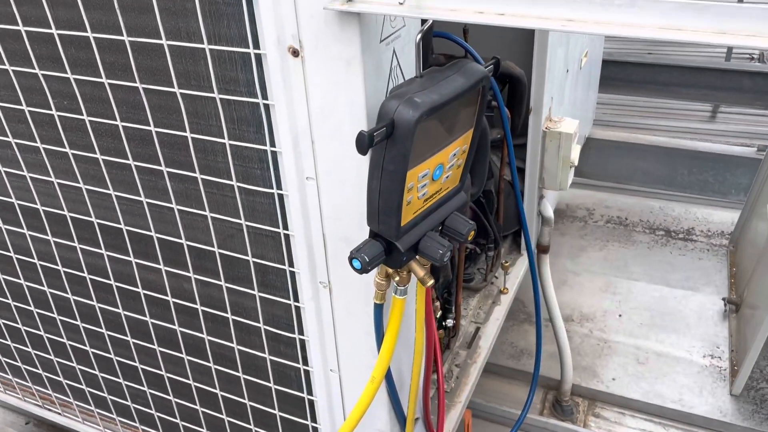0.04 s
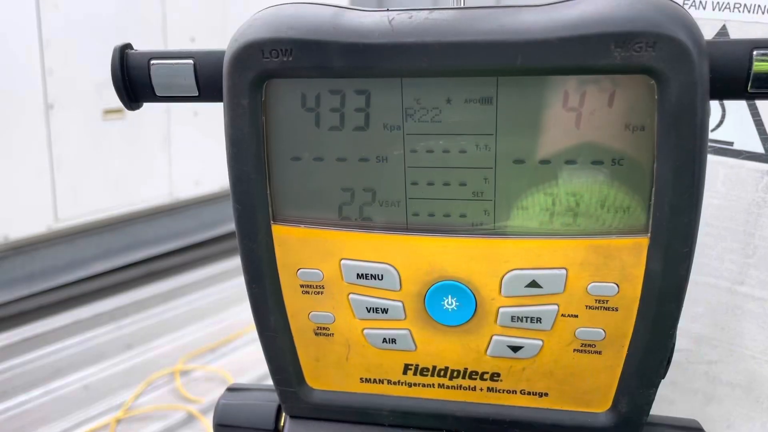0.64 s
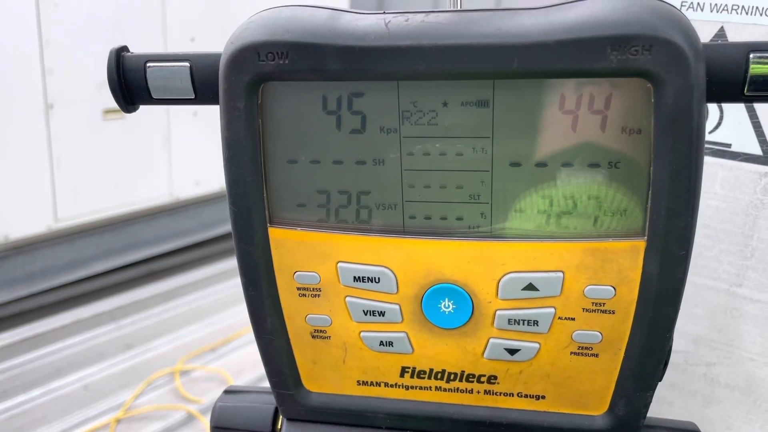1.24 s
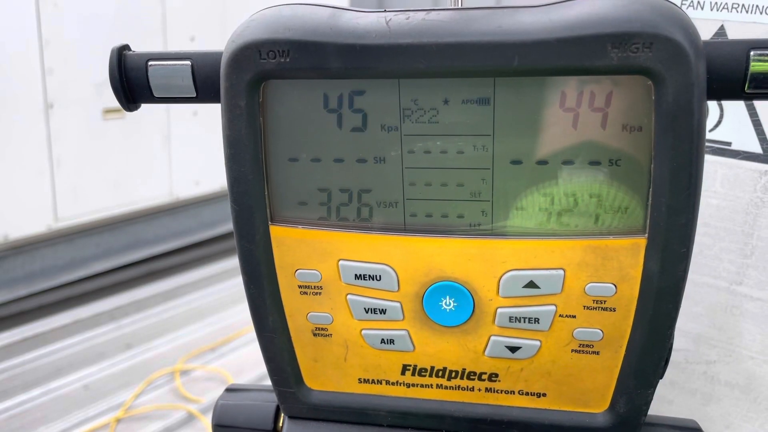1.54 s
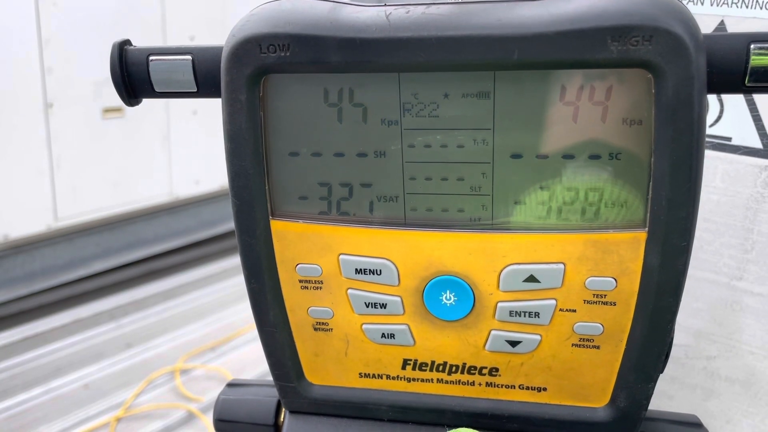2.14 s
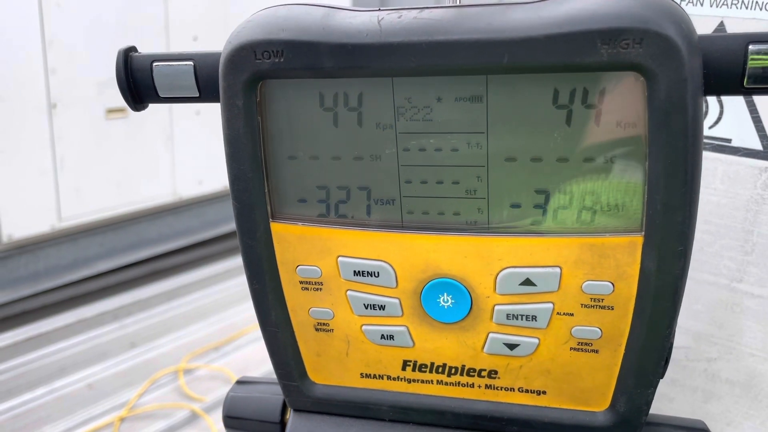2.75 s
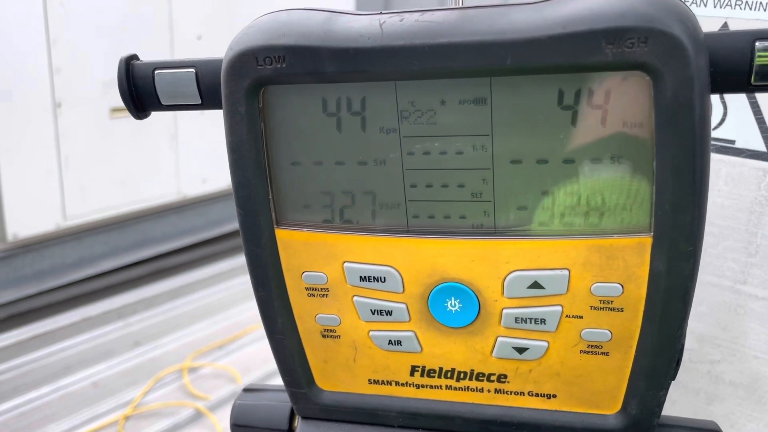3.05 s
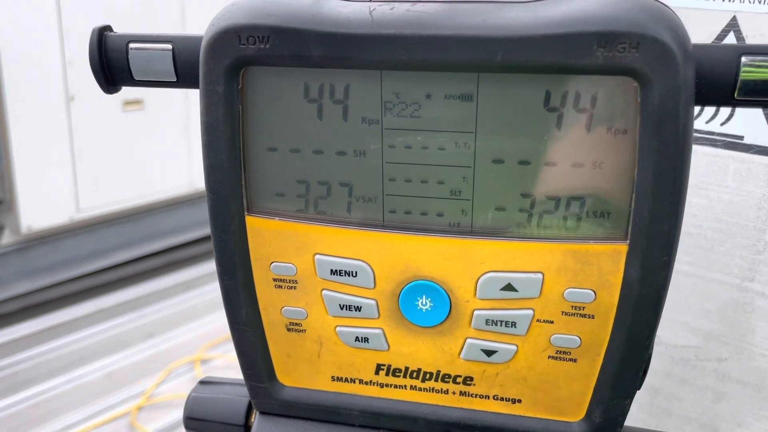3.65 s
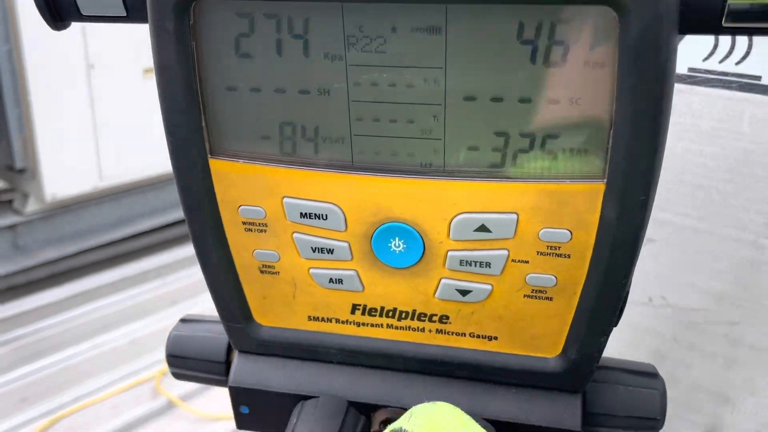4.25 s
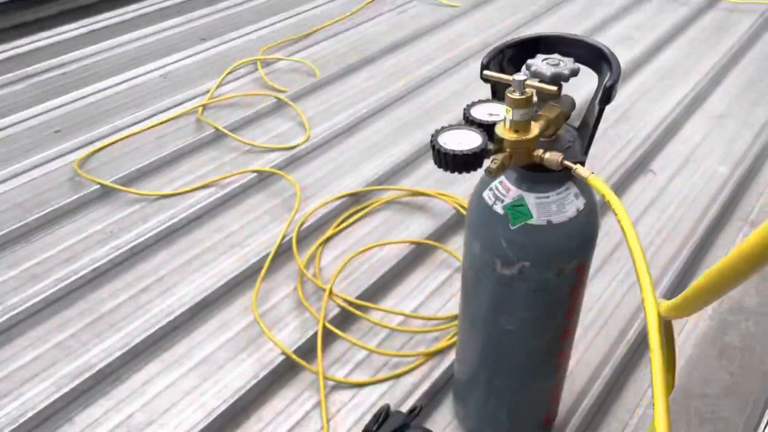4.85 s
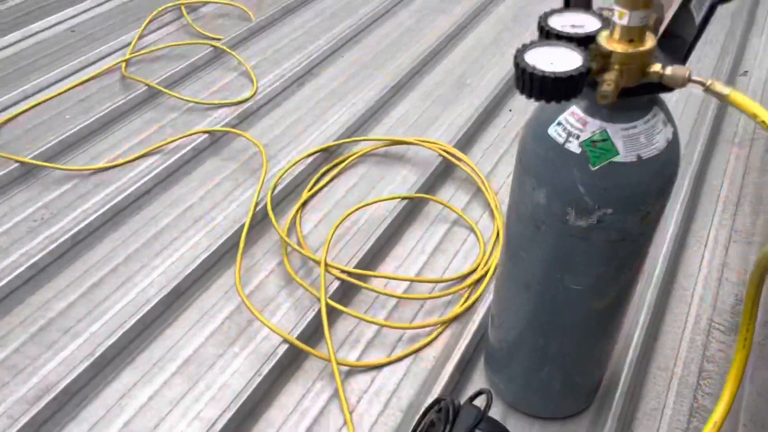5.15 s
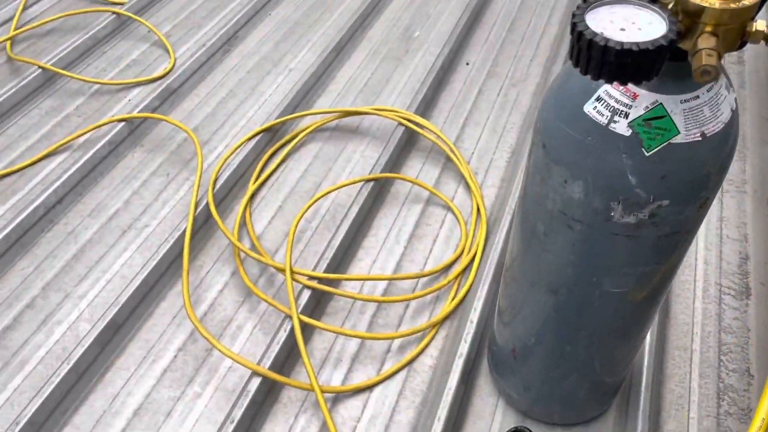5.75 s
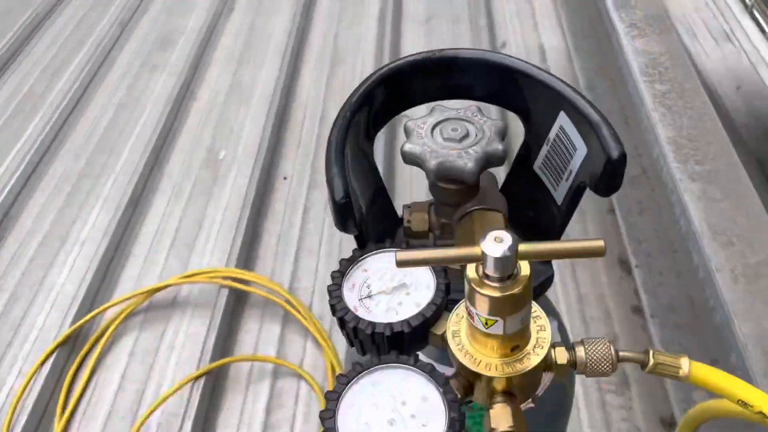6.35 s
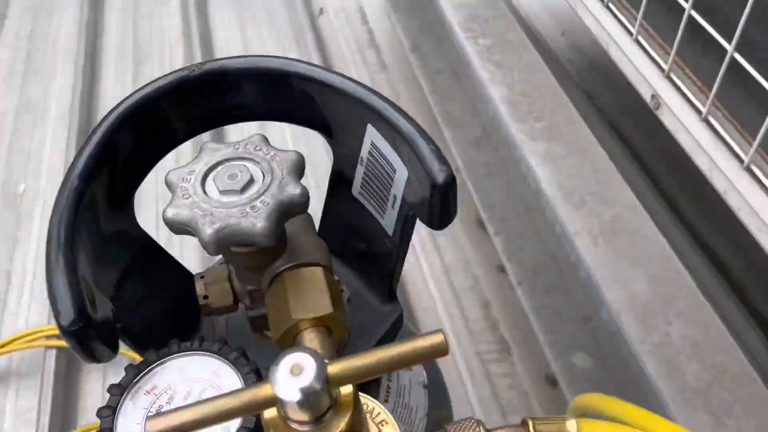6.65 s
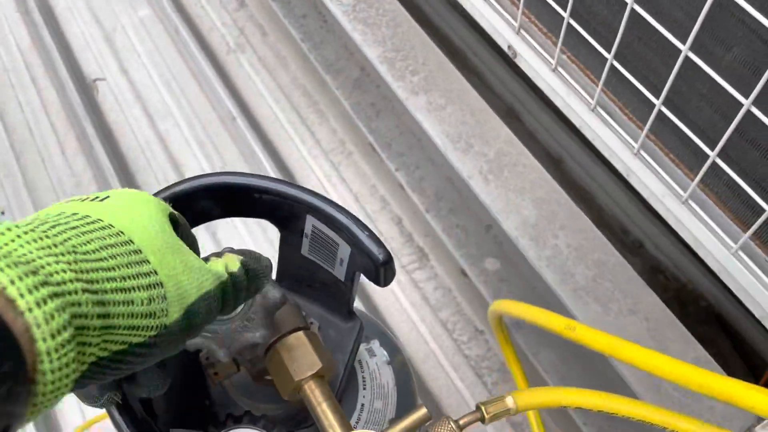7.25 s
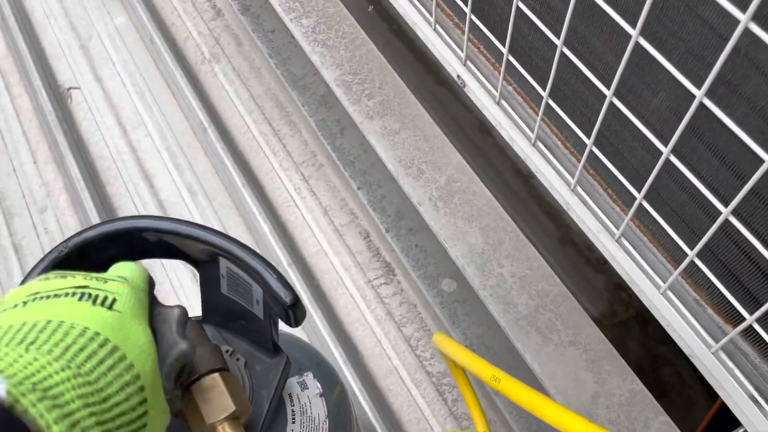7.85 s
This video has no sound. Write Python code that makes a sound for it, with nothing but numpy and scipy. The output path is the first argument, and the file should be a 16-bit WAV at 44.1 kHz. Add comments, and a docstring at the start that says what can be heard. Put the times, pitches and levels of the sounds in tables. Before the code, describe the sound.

A hand-held microphone outdoors picks up the constant low roar and hum of rooftop cooling fans, opening with a short thump of wind. A faint, high hiss of gas swells in brass fittings and fades. Someone then takes a few crunching steps that boom on the metal roof, bumps a steel gas cylinder so that it clunks and rocks, and handles the valve with small ticks and a scrape while the machinery drones on.

```python
"""Air-conditioning plant rumbles and hums on a sheet-metal roof, heard from a hand-held microphone.
Wind buffets it and air rasps in cabinet fins until 0.38 s, where the level dips briefly.
From 3 s nitrogen hisses through a gauge manifold, sings in its fittings and dies away.
From 4.9 s someone takes a few booming, gritty steps over the roof to the gas cylinder,
jolts it at 6.6 s and handles its valve."""
import sys
import numpy as np
from scipy import signal
from scipy.fft import rfft, irfft, next_fast_len
from scipy.io import wavfile
from scipy.ndimage import uniform_filter1d, map_coordinates

SR = 44100
rng = np.random.default_rng(int(sys.argv[2]) if len(sys.argv) > 2 else 0)


def pcm_store(signal):
    """Save signal as 16-bit PCM."""
    levels = np.round(np.clip(np.atleast_2d(signal), -1, 1) * 32767)
    wavfile.write(sys.argv[1], SR, levels.astype(np.int16).T)


N = 348831
N_FFT = next_fast_len(N)
T = np.arange(N) / SR
F = np.maximum(np.fft.rfftfreq(N_FFT, 1 / SR), 1)
SIDE = np.array([[1], [-1]])  # left, right
DIP_S = 0.377

# Heel and sole contacts. Each row: time in s, weight in dB, grit in dB, rise in s.
STEPS = [(4.857, -20, -31, 0.0016), (5.095, -11, -35, 0.021), (5.471, -14.5, -36, 0.002),
         (5.504, -4.5, -26.5, 0.0076), (5.558, -19, -37, 0.013), (5.629, -26, -28.5, .0015),
         (6.124, -36, -31.5, .005), (6.206, -19.5, -27.5, 0.0068), (6.241, -19, -44, .013),
         (6.334, -23, -31.5, 0.0055), (6.557, -11.5, -24.5, 0.002)]


def amp(db):
    """Decibels to gain."""
    return np.exp(np.asarray(db) * (np.log(10) / 20))


def colour(rows, column=1):
    """Gain over F from one dB column of a spectrum table."""
    table = np.transpose(rows)
    return amp(np.interp(np.log(F), np.log(table[0]), table[column]))


def resonance(hz, width_hz):
    """Squared resonance curve over F, 1 at its centre."""
    return 1 / (1 + ((F / hz - hz / F) * (hz / width_hz)) ** 2)


def lift(rows):
    """Gain of resonances standing out from a broad sound."""
    return 1 + sum((amp(lift_db) - 1) * resonance(hz, width_hz) for hz, width_hz, lift_db in rows)


def unit(x):
    """Scale to rms 1."""
    return x / np.sqrt(np.mean(np.abs(x) ** 2))


def white():
    """Spectrum of white noise."""
    return rfft(rng.standard_normal(N_FFT))


def wave(spectrum):
    """Spectrum to sound."""
    return irfft(spectrum, N_FFT)[..., :N]


def pair(side_gain):
    """White noise spectra at two microphone ports that hear nearly the same treble."""
    # Each row: frequency in Hz, extra gain of the unshared part in dB.
    port_width = [(4500, 1), (6000, 2.5), (7500, -44)]
    side = side_gain * colour(port_width)
    return (white() + SIDE * side * white()) / np.sqrt(1 + side ** 2)


def noise(gain, side_db):
    """Coloured stereo noise, rms 1."""
    return unit(wave(pair(amp(side_db)) * gain))


def drift(rate_hz):
    """Random levels, held and smoothed twice; spread near 1."""
    hold = max(int(SR / rate_hz), 1)
    held = np.repeat(rng.standard_normal(N // hold + 1), hold)[:N]
    return 1.3 * uniform_filter1d(uniform_filter1d(held, hold), hold)


def swell(peak_s, rise_s, t60_s):
    """Envelope: exponential rise to 1 at peak_s, then exponential fall."""
    start, end = np.searchsorted(T, [peak_s - 10 * rise_s, peak_s + 2 * t60_s])
    t, out = T[start:end] - peak_s, np.zeros(N)
    out[start:end] = np.exp(np.minimum(t / rise_s, -t * np.log(1000) / t60_s))
    return out


def add(track, start_s, sound):
    """Mix a short sound into a track."""
    part = track[..., int(start_s * SR):][..., :sound.shape[-1]]
    part += sound[..., :part.shape[-1]]


def strike(modes, scatter_db=2):
    """Stereo ring of a struck body, peak 1; each blow stirs the modes differently."""
    age, ring = T[:SR // 4], 0
    for hz, db, t60_s in modes:
        envelope = amp(db + scatter_db * rng.standard_normal((2, 1)) - 60 * age / t60_s)
        ring = ring + envelope * np.sin(2 * np.pi * hz * age) * rng.choice([-1, 1])
    return ring / np.abs(ring).max()


def route(leave_s=4.24, arrive_s=6.8):
    """Microphone place (0 gauges, 1 cylinder), with the roar and fan-rush gains in dB there."""
    # The roar is louder in the open. Each row: time in s, gain in dB.
    exposure = [(1.5, 0), (4.3, 0), (4.7, 2), (6.8, 1.5), (7.9, 1.2)]
    place = np.clip((T - leave_s) / (arrive_s - leave_s), 0, 1)
    roar_db = np.interp(T, *np.transpose(exposure))
    rush_db = 1 - 3 * place
    beside_cabinet = [[.18], [1.5], [-3]]  # shielded from the rush
    return np.where(T < DIP_S, beside_cabinet, [place, roar_db, rush_db])


def wall_echo(x, place, gauges_s=.0052, cylinder_s=.0043, echo_db=-20):
    """The cabinet wall returns the roar; the comb shifts as the microphone moves."""
    delayed_s = T - gauges_s - place * (cylinder_s - gauges_s)
    return x + amp(echo_db) * np.array([np.interp(delayed_s, T, channel) for channel in x])


def fan_roar(place, roar_db, rush_db, gain_db=-24, flicker_db=.87, throb_db=1.1, throb_top_hz=150):
    """Turbulent air from fans and compressors; each octave flickers on its own and the bass throbs."""
    # Each row: frequency in Hz, relative density in dB at the gauges, the same at the cylinder.
    spectra = [(27, -38, -24), (38, -48, -17), (52.2, 0.5, -2), (104.3, 2, -1.5), (132.7, -10.5, -4),
               (183, -8, -12.5), (366, -18.5, -13.5), (610, -18.5, -18.5), (1096, -19.5, -21),
               (1487, -27, -23.5), (2640, -33, -31.5), (3080, -37, -35.5), (7070, -50.5, -48),
               (8100, -55.5, -53.5), (11250, -58.5, -57.5), (14900, -73, -71)]
    # Casing and duct resonances. Each row: centre in Hz, width in Hz, lift in dB.
    casing = [(156.7, 16.7, 6), (590, 75, 2), (870, 44, 2.5), (1296, 36, 6.5), (2290, 260, 3)]
    # Each row: frequency in Hz, side gain in dB ahead of the ports.
    width = [(60, -18), (110, -20.5), (200, -13.5), (380, -3), (700, -6), (1290, 1), (2380, -4), (4400, -4)]
    # Each row: frequency in Hz, left minus right in dB.
    balance = [(100, 0.1), (200, 1), (380, 2.5), (700, 5), (1290, 1), (2380, -0.5), (4400, 1.5),
               (8000, 2.5)]
    at_gauges, at_cylinder = colour(spectra, 1), colour(spectra, 2)
    air = pair(colour(width)) * colour(balance) ** (SIDE / 2) * lift(casing)
    air = air / np.sqrt(np.mean(at_gauges ** 2))
    out, bass_db = 0, throb_db * drift(7)
    for octave in range(-5, 5):
        centre_hz = 1000 * 2. ** octave
        band = air * np.maximum(1 - np.abs(np.log2(F / centre_hz)), 0)
        sound = (1 - place) * wave(band * at_gauges) + place * wave(band * at_cylinder)
        waver_db = flicker_db * drift(9) + bass_db * (centre_hz < throb_top_hz)
        rush_share = np.exp(-octave ** 2 / 2)  # around 1 kHz
        out = out + sound * amp(waver_db + rush_db * rush_share)
    return wall_echo(out, place) * amp(gain_db + roar_db)


def tone(hz, waver_hz, fade_db=2, roughness=.3):
    """Wavering machine tone, rms 1; higher tones differ more in phase between the ports."""
    phase = 2 * np.pi * np.cumsum(hz + waver_hz * drift(14)) / SR
    apart_rad = SIDE * min(hz / 1500, 1) * (.75 + .2 * drift(1.5))
    return unit(np.sin(phase + apart_rad) * amp(fade_db * drift(5)) * (1 + roughness * drift(30)))


def motor_hum(place, whine_hz=1296):
    """Shaft and blade tones; different units stand out along the route."""
    # Each row: pitch in Hz, level in dB at the gauges, the same at the cylinder, waver in Hz.
    machines = [(48.4, -35, -33, .6), (98, -44, -46, 2.5), (301, -41, -50, 3.4), (323, -58, -38.5, 1.5),
                (484.5, -53, -49.5, 1), (533, -54, -52, 2), (592, -51, -53, 3), (641, -55, -45.5, 2.5),
                (905.3, -50.5, -45, 1.8), (1296, -53, -56, 5), (2280, -55.5, -61, 18), (2822, -67, -66, 3)]
    hum = sum(tone(hz, waver_hz) * amp(gauges_db + place * (cylinder_db - gauges_db))
              for hz, gauges_db, cylinder_db, waver_hz in machines)
    # A blade tone flares as the microphone turns, then lingers with its lower octave.
    flare = amp(-33) * swell(4.57, rise_s=.025, t60_s=.55)
    linger = amp(-45) * swell(5.0, rise_s=.3, t60_s=3)
    whine = tone(whine_hz, waver_hz=3.44) * np.maximum(flare, linger)
    lower_octave = tone(whine_hz / 2, waver_hz=3) * amp(1) * linger
    return hum + whine + lower_octave


def fin_rasp(level_db=-49.5, grain_db=4):
    """Air rasps through the cabinet fins until DIP_S."""
    air = noise(resonance(2540, width_hz=630), side_db=-5)
    return air * unit(amp(grain_db * drift(120))) * amp(level_db) * (T < DIP_S)


def wind():
    """Eddies thump on the microphone until DIP_S; gusts set their size."""
    # Each row: frequency in Hz, relative density in dB.
    spectrum = [(20, -24), (40, 1), (70, 8), (110, -1), (230, -13), (320, -11), (420, -17), (800, -42),
                (2000, -82)]
    # Each row: time in s, level in dB.
    gusts = [(.012, -17), (.074, -7), (.203, -11), (0.233, -15), (.268, -18), (.298, -12), (.342, -11.5)]
    eddies = noise(colour(spectrum), side_db=-15)
    running_rms = np.sqrt(uniform_filter1d(np.mean(eddies ** 2, axis=0), size=1500))
    envelope = np.max([amp(db) * swell(s, rise_s=.011, t60_s=.13) for s, db in gusts], axis=0)
    return eddies / running_rms * envelope * (T < DIP_S)


def nitrogen(open_s=3.04, opening_s=.05, peak_s=3.335, hiss_db=-46, sing_db=-44, sag_per_s=.004):
    """Gas jets through the valve seat and rings the fittings, dying as the pressures level out."""
    # Each row: frequency in Hz, relative density in dB.
    jet_spectrum = [(2500, -16), (4000, 3), (6800, -2), (9400, 2), (10300, 6), (11000, -6), (12000, -6),
                    (13600, -5), (15500, -8)]
    # Resonances. Each row: centre in Hz, width in Hz, relative gain in dB.
    fittings = [(3998, 24, -2.5), (4130, 20, -5), (4180, 26, 1.5), (5625, 20, -11), (6308, 20, -11),
                (6620, 110, -14), (6968, 24, -3), (8970, 30, -14), (9860, 40, -15), (10130, 30, -12),
                (10400, 60, -13), (10610, 80, -15), (10920, 200, -8.5), (11300, 34, -12), (11620, 45, -13),
                (12190, 32, -14)]
    hiss_db_per_s, sing_db_per_s, fade_db_per_s = 13, 20, -44
    valve = np.clip((T - open_s) / opening_s, 0, 1)
    since_peak_s = T - peak_s
    fade_db = fade_db_per_s * since_peak_s
    flow_db = np.minimum(hiss_db_per_s * since_peak_s, fade_db)
    jet = noise(colour(jet_spectrum), side_db=-7)
    hiss = jet * amp(hiss_db + flow_db + drift(37))
    gas, song = white(), 0
    rings = [wave(gas * amp(db) * resonance(hz, width_hz)) for hz, width_hz, db in fittings]
    for ring, (hz, _, _) in zip(rings, fittings):
        follow = (hz / 11000) ** .68  # high resonances need a fast jet; low ones come late and linger
        ring_db = np.minimum(sing_db_per_s * since_peak_s / follow, fade_db * follow)
        song = song + ring * amp(ring_db)
    sagged_s = T - sag_per_s * since_peak_s ** 2 / 2  # pitch falls as the expanding gas cools
    song = map_coordinates(song, [sagged_s * SR]) / np.std(sum(rings))
    return valve * (hiss + song * amp(sing_db))


def handling(grain_db=2, crack_db=-9):
    """Glove and hose rub; brass couplings and the valve tick with a crack and a short ring."""
    # Rubs and cracks. Each row: frequency in Hz, relative density in dB.
    spectrum = [(2000, -14), (4500, -6), (6800, -3), (8200, -2), (9600, 0), (10800, 4), (12300, -2),
                (13500, -11), (15300, -12)]
    # Each row: time in s, level in dB, rise in s, t60 in s.
    rubs = [(4.26, -59, .03, 0.71), (4.545, -51.5, 0.037, 0.2), (5.09, -50, 0.037, .25),
            (5.41, -60, .04, .3), (5.507, -47, .012, .14), (5.655, -52, .012, .12), (6.126, -52, .004, .3),
            (6.208, -48, .006, .17), (6.257, -57, .006, .12), (6.33, -47, .002, 0.16),
            (6.395, -57, .02, .15), (6.572, -34, 0.0071, 0.125), (6.71, -50, 0.03, 0.25),
            (6.757, -44, .003, .11)]
    # Each row: time in s, peak of the ring in dB.
    ticks = [(5.503, -34), (5.629, -35), (6.186, -42), (6.556, -25), (6.569, -26), (6.661, -42),
             (6.706, -35), (6.749, -29), (6.755, -29), (7.04, -46), (7.137, -41)]
    # Each row: frequency in Hz, relative level in dB, t60 in s.
    brass_modes = [(6200, -9, .04), (6720, -5, 0.045), (9700, 1, 0.031), (10500, -4, .02),
                   (12300, -5, 0.014), (15290, 0, .008)]
    bright = noise(colour(spectrum), side_db=-12)
    rubbing = sum(amp(db) * swell(s, rise_s, t60_s) for s, db, rise_s, t60_s in rubs)
    out = rubbing * bright * unit(amp(grain_db * drift(700)))
    for s, db in ticks:
        out += amp(db + crack_db) * swell(s, rise_s=.0003, t60_s=.018) * bright
        add(out, s, amp(db) * strike(brass_modes))
    return out


def scrapes(slip_db=2.5):
    """Rubber soles, then the glove, stick and slip on metal; each contact squeaks in its own band."""
    # Each row: time in s, level in dB, centre in Hz, width in Hz.
    contacts = [(4.91, -43, 3950, 1800), (5.105, -43, 5370, 900), (5.27, -27, 1170, 1100),
                (5.511, -18, 400, 220), (6.142, -40.5, 4000, 2200), (6.24, -23.5, 360, 300),
                (6.265, -37.5, 4140, 1700), (6.305, -29, 417, 400), (6.355, -37.5, 4040, 1000),
                (6.375, -27, 500, 550), (6.398, -35.5, 4270, 750), (6.43, -51, 4380, 700),
                (7.785, -32, 1650, 750)]
    friction, out = pair(amp(-6)), 0
    slips = unit(amp(slip_db * drift(300)))
    for s, db, hz, width_hz in contacts:
        squeak = unit(wave(friction * resonance(hz, width_hz)))
        out = out + amp(db) * swell(s, rise_s=.019, t60_s=.18) * squeak
    return slips * out


def clicks():
    """Stones and fittings click dryly during the walk, each in its own band."""
    # Each row: time in s, level in dB, centre in Hz.
    hits = [(4.858, -36.5, 4000), (5.102, -41, 5300), (5.469, -36, 4200), (5.504, -30, 3800),
            (5.63, -35, 4330), (5.655, -40, 4600), (6.188, -40, 5000), (6.207, -30.5, 4030),
            (6.257, -36, 4300), (6.299, -37, 4000), (6.329, -37, 4700), (6.341, -37, 4100)]
    crack, out = pair(amp(-6.5)), 0
    for s, db, hz in hits:
        band = unit(wave(crack * resonance(hz, width_hz=2300)))
        out = out + amp(db) * swell(s, rise_s=.0022, t60_s=.07) * band
    return out


def cylinder_clunks():
    """The jolted steel cylinder clunks and rocks to rest."""
    # Each row: start in s, peak in dB.
    jolts = [(6.556, -11), (6.568, -14), (6.578, -19), (6.614, -21), (6.651, -24)]
    # Cylinder, guard and roof under it. Each row: frequency in Hz, relative level in dB, t60 in s.
    modes = [(92, 12, .14), (254, 7, .22), (343, 5, 0.15), (617, 3, .14), (726, 2.5, 0.25), (922, 0, 0.14),
             (1220, -1, 0.096), (1656, -7, 0.089), (2020, -1, 0.086), (2305, -7, .12), (2611, -11, 0.084),
             (2800, -13, .09), (5100, -6, 0.06)]
    out = np.zeros((2, N))
    for s, db in jolts:
        add(out, s, amp(db) * strike(modes))
    return out


def sheet_knocks(knock_db=-3, cushion_db=1):
    """A hard heel knocks the sheet against its fixings; a slower contact knocks less."""
    # Each row: frequency in Hz, relative level in dB, t60 in s.
    clank_modes = [(393, 9, 0.12), (452, 6.5, .12), (555, 1, 0.1), (850, -4, .1), (920, 3, 0.12),
                   (1110, -6, 0.061), (1400, -9, 0.05), (1795, -5, 0.1), (2180, -7, 0.043),
                   (2650, -17, 0.043), (5030, -16, 0.036)]
    out = np.zeros((2, N))
    for s, weight_db, _, rise_s in STEPS:
        softness = np.log2(max(rise_s / .001, 1))  # doublings above 1 ms
        add(out, s, amp(weight_db + knock_db - cushion_db * softness) * strike(clank_modes))
    return out


def footsteps(rattle_db=-14.5, tail_db=-15, grit_db_per_octave=-2, push_s=.004):
    """Each footfall booms the roof sheet, rattles its laps and crushes grit under the sole."""
    # Each row: frequency in Hz, relative level in dB, t60 in s.
    sheet_modes = [(61.3, -12.5, 0.7), (93, -3, 0.14), (110, -3, 0.22), (163.7, -0.5, 0.1), (239, -6, 0.08),
                   (324, -8.5, 0.07), (478, -20, 0.11)]
    # Hollow ring of ribs and laps. Each row: centre in Hz, width in Hz, lift in dB.
    ribs = [(385, 70, 9.5), (590, 56, 8), (910, 100, 16), (1070, 85, 14.5), (1880, 65, 4.5), (2480, 190, 1),
            (3950, 300, 5), (4870, 120, 5)]
    # Each row of both: frequency in Hz, relative density in dB.
    rattle_spectrum = [(120, 10.5), (300, -5), (450, 4), (900, -10.5), (1500, -10.5), (2500, -23.5),
                       (5000, -63)]
    grit_spectrum = [(600, -17.5), (1500, 4), (2500, 3.5), (4200, -1.5), (5600, -6.5), (7000, -8.5),
                     (8200, -17), (10500, -21), (13000, -32), (15500, -38)]
    rattle = noise(colour(rattle_spectrum) * lift(ribs), side_db=-6.5)
    tilt = amp(grit_db_per_octave * np.log2(F))
    grit = noise(colour(grit_spectrum) * lift(ribs) * tilt, side_db=-2.5)
    grains = unit(amp(drift(500)))
    age = T[:SR]
    # Neighbouring modes swing in opposite directions under the foot.
    ring = sum((-1) ** k * amp(db - 60 * age / t60_s) * np.sin(2 * np.pi * hz * age)
               for k, (hz, db, t60_s) in enumerate(sheet_modes))
    ring *= 1 - np.exp(-age / push_s)  # a soft sole loads the sheet gradually
    ring /= np.abs(ring).max()
    boom, shudder, crunch = np.zeros(N), 0, 0
    for s, weight_db, grit_db, rise_s in STEPS:
        add(boom, s, amp(weight_db) * ring)
        contact = swell(s, rise_s, t60_s=.25)
        tail = amp(tail_db) * swell(s, rise_s, t60_s=.33)  # the shudder spreads along the sheet
        shudder = shudder + amp(rattle_db + weight_db) * (contact + tail)
        crunch = crunch + amp(grit_db) * swell(s, rise_s, t60_s=.21)
    return boom + shudder * rattle + crunch * grains * grit


def scene():
    """The plant all round, with wind, gas, steps and handling in front."""
    place, roar_db, rush_db = route()
    background = fan_roar(place, roar_db, rush_db) + motor_hum(place) + fin_rasp() + wind()
    return (background + nitrogen() + footsteps() + sheet_knocks() + clicks()
            + cylinder_clunks() + scrapes() + handling())


def record(dry, in_phase_hz=4800, half_turn_hz=3450, ceiling=.92, dip_db=-30, top_hz=15800):
    """The channels turn out of phase in the treble; peaks round off, the level dips briefly; low-pass."""
    apart_rad = np.pi * np.maximum(F - in_phase_hz, 0) / half_turn_hz
    turned = wave(rfft(dry, N_FFT) * np.exp(-.5j * apart_rad * SIDE))
    rounded = turned / (1 + (turned / ceiling) ** 8) ** (1 / 8)
    dip = amp(dip_db * np.exp(-np.abs(T - DIP_S) / .011))
    low_pass = signal.ellip(8, .2, 80, top_hz, fs=SR, output="sos")
    return signal.sosfilt(low_pass, rounded * dip)


dry = scene()
out = record(dry)
pcm_store(out)
```